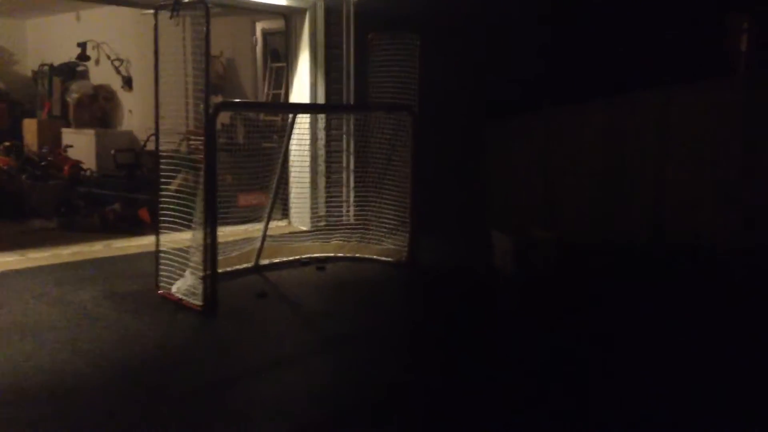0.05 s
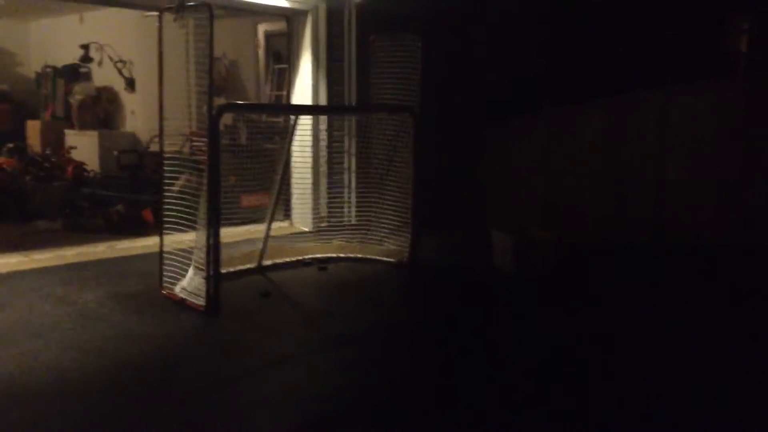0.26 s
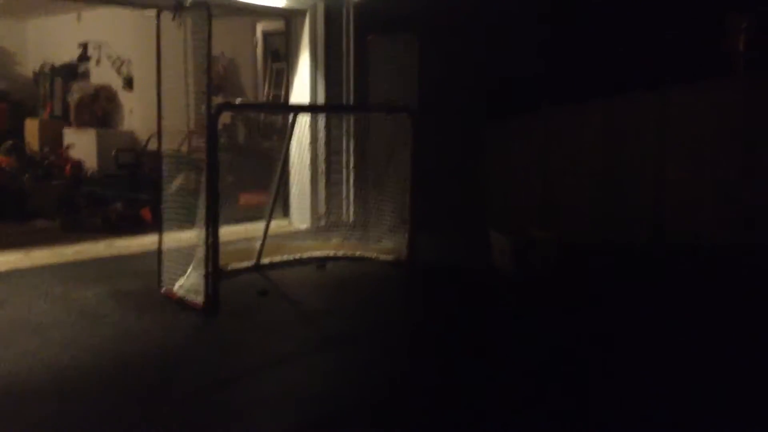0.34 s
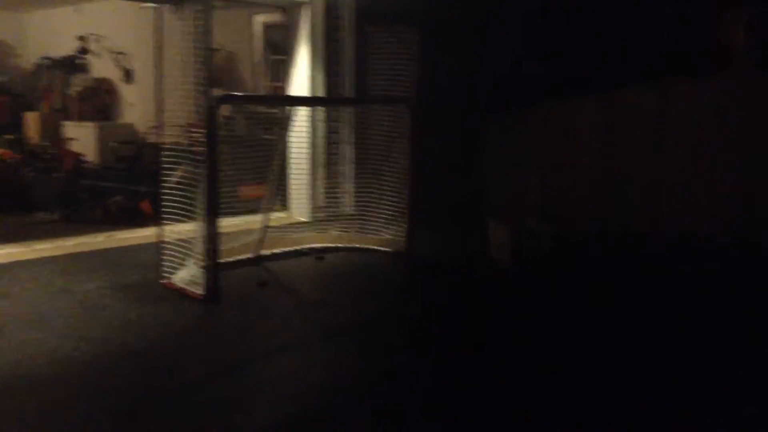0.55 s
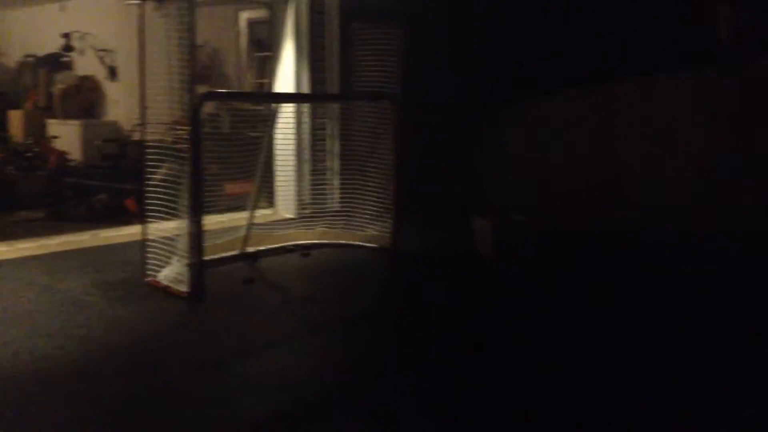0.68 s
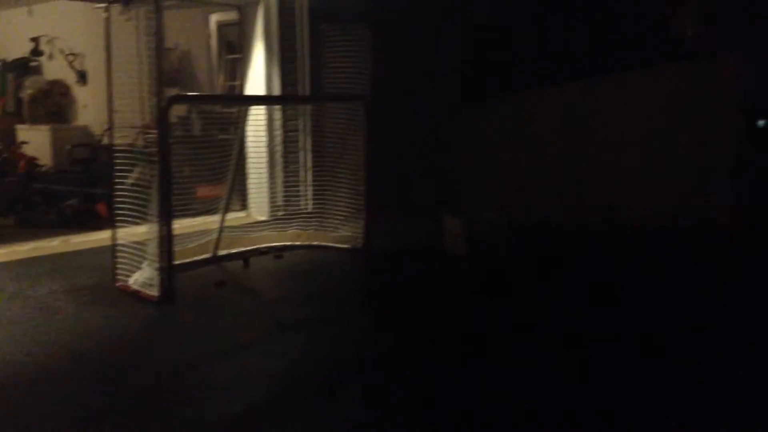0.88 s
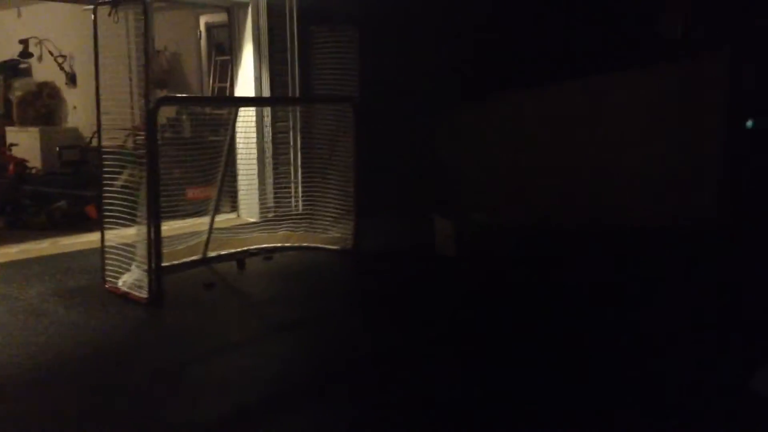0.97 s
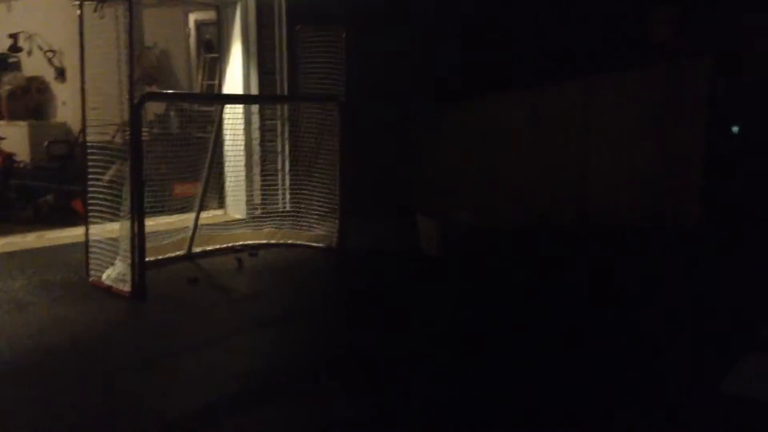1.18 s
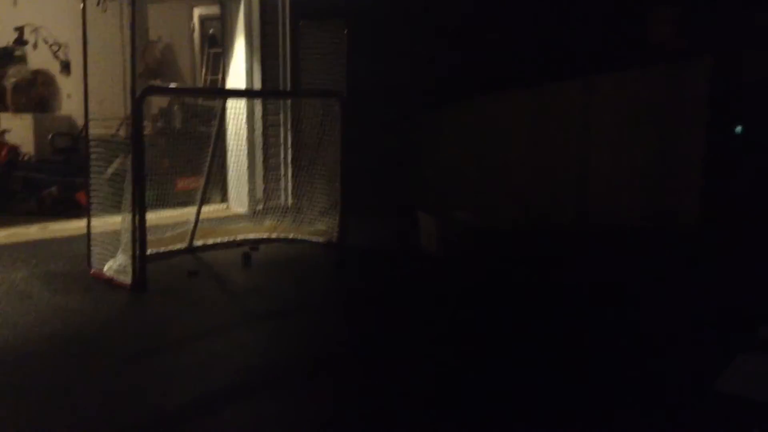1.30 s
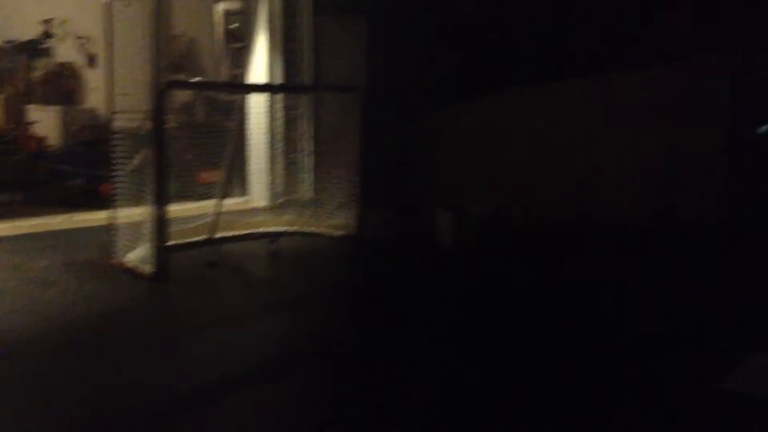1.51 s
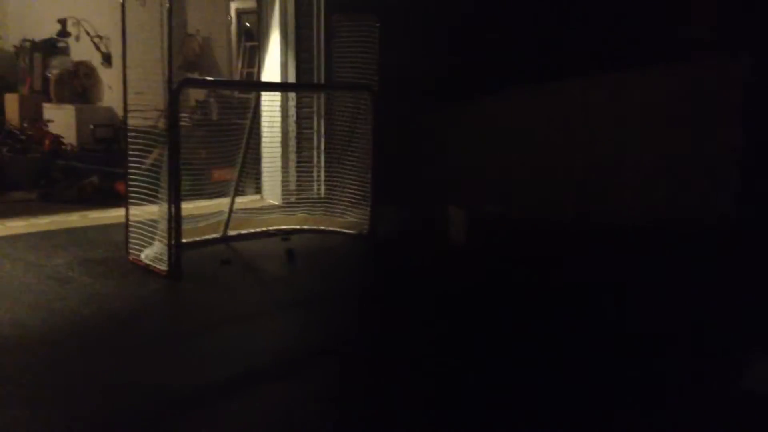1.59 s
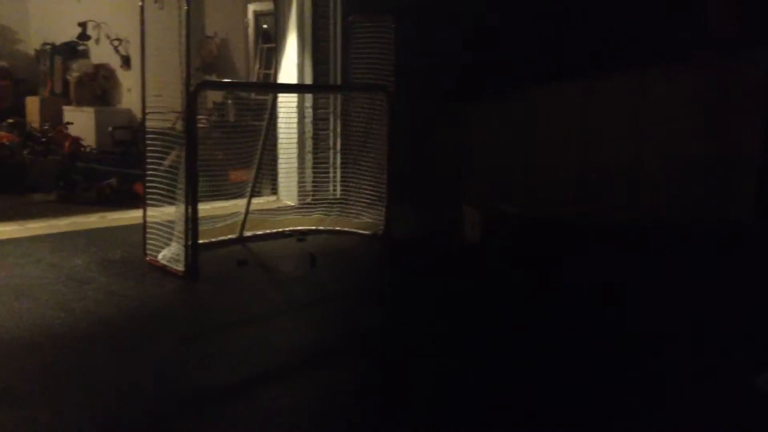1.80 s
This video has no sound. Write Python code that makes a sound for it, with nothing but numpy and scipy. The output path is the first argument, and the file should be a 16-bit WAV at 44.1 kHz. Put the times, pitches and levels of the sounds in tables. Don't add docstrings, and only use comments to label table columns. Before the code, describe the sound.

One sharp hockey stick crack outdoors, quick wall echoes, then wind rumble, knocks and a shoe squeak

```python
import sys
import numpy as np
from scipy import signal
from scipy.fft import rfft, irfft
from scipy.io import wavfile
from scipy.ndimage import uniform_filter1d

SR = 44100
rng = np.random.default_rng(int(sys.argv[2]) if len(sys.argv) > 2 else 0)


def generate_wav(signal):
    frames = np.transpose(np.atleast_2d(signal))
    scaled = np.clip(frames, -1, 1) * 32767
    pcm = np.round(scaled).astype(np.int16)
    wavfile.write(sys.argv[1], SR, pcm)


def invert_db(level):
    return 10 ** (np.asarray(level, dtype=float) / 20)


N = 81585

# start_s, force_db, hardness (0-1)
CONTACTS = [
    (.2440, -4.5, 0.9),
    (.2455, -0.5, 1),
    (.2483, 3, 0.82),
    (.2522, -9, 0.5),
    (.2548, -36, 0),
    (.2594, -5, 1),
    (.2618, -13, 1),
    (.2631, -13, 0.9),
]
# pitch_hz, level_db, t60_s
BLADE_MODES = [(406, -9, 0.067), (957.4, -7.5, 0.099), (1190, -16, 0.038), (1568, -2, 0.09),
               (1680, -12, 0.12), (2090, 3.5, 0.039), (2173, -8, 0.082), (2500, -10, 0.067),
               (2750, -27, 0.035), (3360, -5.5, .03), (3570, -11, 0.032), (4260, -3.5, 0.036),
               (6600, -14, 0.06), (9430, -8.5, 0.06)]
# freq_hz, level_db (per Hz)
SCRAPE_SPECTRUM = [(300, -41), (600, -30), (1000, -12), (2200, -3.5), (4800, -18), (8300, -18), (9400, -15),
                   (15500, -36)]
# delay_s, peak_db, centre_hz, width_hz
ECHOES = [(.026, -10, 1790, 1510), (.032, -9, 870, 396), (.042, -19, 860, 510), (.050, -14, 1700, 1200),
          (.057, -18, 900, 300), (.073, -21, 2130, 400), (.074, -29, 950, 300), (.056, -24, 2130, 300),
          (.059, -19, 3660, 500), (.100, -37, 850, 300), (.122, -23.5, 715, 136), (.132, -28, 715, 136),
          (.140, -31, 715, 136), (.148, -30, 740, 200), (0.116, -25, 862, 201), (.122, -29, 2000, 500),
          (.158, -35, 2150, 400), (.186, -32, 2150, 400), (.194, -28.5, 2180, 200), (.186, -28, 1300, 1000),
          (.242, -36, 950, 250), (.246, -37, 2300, 600), (.262, -36, 950, 300), (.187, -37, 6500, 1500),
          (.195, -35, 6550, 400), (0.230, -31.5, 1560, 250), (.232, -32.5, 6400, 4000),
          (.270, -38, 2300, 500), (.303, -33, 4630, 3900)]
# freq_hz, t60_s
YARD_DECAY = [(300, 0.22), (800, 0.42), (1500, 0.35), (3000, .26), (6000, .24), (10000, 0.2), (15000, 0.17)]
# freq_hz, level_db (per Hz)
YARD_SPECTRUM = [(350, -19), (600, -17), (880, -4), (1200, -11.5), (2100, -7.5), (4000, -12), (11500, -21),
                 (15000, -36)]
# pitch_hz, width_hz, boost_db
STICK_IN_YARD = [(1560, 160, 5.5), (2140, 150, 7.5), (2590, 92, 5), (6550, 250, 2.5), (9400, 600, 4)]
# start_s, peak_db, pitch_hz, cycles, snap_db
TICKS = [(.052, -42.5, 9300, 9.5, -8), (.211, -43, 5570, 4.2, -3), (.526, -38, 10500, 8, -20),
         (0.532, -36, 11400, 4, -20), (.537, -32, 10500, 4.5, -20), (0.6388, -22, 1380, 0.55, -30),
         (1.1703, -22, 2100, 2, -16), (1.1705, -22, 750, 1.2, -30), (1.1724, -21, 1000, 1.5, -20),
         (1.2553, -16, 1020, 2.7, -24), (1.2559, -11, 2100, 2.9, -26), (1.223, -49, 6040, 3.5, 0),
         (1.556, -46, 4000, 1.6, 12), (1.571, -29.5, 1035, 3.4, -12), (1.6030, -14.5, 278, 1.06, -44),
         (1.662, -33, 2180, 9, -15), (1.668, -36, 2180, 8, -20), (1.662, -36, 1080, 4, -30),
         (1.685, -35, 3150, 6, 0), (1.697, -33, 1150, 2.5, -15), (1.7748, -19.5, 2150, 2.9, -7),
         (1.7755, -29, 1200, 2.5, -10), (1.7748, -34, 3890, 7, -20), (1.7868, -28, 2100, 5, -10),
         (1.7865, -35, 1150, 3, -25), (1.7445, -36, 2100, 9, -20), (1.717, -46, 9000, 18, -20),
         (.0865, -30, 510, 2.5, -30), (1.2557, -44, 8600, 13, -30), (1.2557, -47, 6830, 12, -30),
         (1.2558, -40, 4260, 8, -30), (1.2592, -29, 1600, 3, -7), (1.268, -39, 1800, 3, -14),
         (1.1715, -26, 2140, 3.2, -15), (1.6015, -28, 560, 1.6, -30), (1.628, -38, 2000, 5, -20),
         (.036, -36, 520, 2, -30)]
# start_s, length_s, rms_db, centre_hz, width_hz
RUSTLES = [(.02, 0.059, -61.5, 4000, 4000), (.172, .046, -65, 5700, 900), (0.162, 0.067, -63, 10000, 1500),
           (0.499, 0.069, -55, 10500, 3000), (.91, .07, -69, 10600, 2000), (0.946, 0.036, -63, 4500, 2000),
           (1.209, .15, -55.5, 2500, 1940), (1.515, 0.18, -50, 1800, 1500),
           (1.647, 0.22, -42.5, 2040, 1680), (1.675, 0.05, -55, 3200, 1200), (1.687, 0.051, -54, 9200, 900),
           (1.713, 0.031, -59, 6600, 500), (1.547, .3, -66, 9000, 1200), (1.69, 0.025, -48, 1640, 201),
           (1.69, 0.025, -49, 850, 200), (0.074, 0.022, -50.5, 490, 303), (.915, .045, -47, 603, 397),
           (1.692, .024, -52, 4250, 250), (1.70, .08, -49, 1700, 120), (1.70, .055, -52, 2350, 250),
           (1.75, .02, -57, 3900, 300), (1.79, .02, -54, 2900, 300)]
# partial_number, level_db
SQUEAK_PARTIALS = [(1, -41), (2, -34), (3, -54), (5, -62)]
# freq_hz, level_db (per Hz)
WIND_SPECTRUM = [(20, -49), (60, -25), (110, -7), (180, 1), (260, -4), (380, -9), (560, -26.5), (900, -35),
                 (1500, -61.5)]
# time_s, level_db
GUSTS = [(0, -39), (.05, -33), (.11, -40), (.15, -51.5), (.21, -43.5), (.3, -43.5), (.42, -46.5),
         (.54, -35), (.58, -37.5), (.70, -31), (.8, -34.5), (.93, -32.5), (1.05, -38), (1.22, -33),
         (1.36, -32), (1.55, -40.5), (1.72, -38.5), (1.85, -33.5)]
# freq_hz, level_db (per Hz)
AIR_SPECTRUM = [(18, -64), (30, -52), (106, 1), (226, -5), (566, -15), (2100, -25.5), (3280, -42),
                (11800, -50.5), (15800, -49)]

BLADE_DB, SOFT_HZ, HARD_HZ = -16, 1200, 9000
STICK_LOW_HZ, STICK_TOP_HZ = 330, 14000
SHAFT_S, SHAFT_HZ, SHAFT_DB, SHAFT_RISE_S, SHAFT_HOLD_S, SHAFT_T60_S = .24385, 850, -8.5, .00052, .012, .055
SCRAPE_S, SCRAPE_LEN_S, SCRAPE_DB, SCRAPE_RISE_S, SCRAPE_T60_S = .2445, .017, -13.5, .0018, .034
ECHO_T60_S = .028
YARD_S, YARD_DB, YARD_HOLD_S, YARD_RISE_S, YARD_PATCH_DB = .25, -23.5, .055, .014, 1.6
WALL_END_S, WALL_END_DB = .075, -5
FAR_DB, FAR_STRETCH = -12.5, 4.46
FENCE_S, FENCE_LEN_S, FENCE_DB = .225, .08, 3.5
SNAP_S, SNAP_TOP_HZ, PORT_HZ, PORT_DB = .0018, 3890, 9000, -12.5
GRAINS_PER_S, GRAIN_DB = 4900, 3
SQUEAK_S, SQUEAK_LEN_S, SQUEAK_HZ, SQUEAK_FLUTTER_DB = 1.664, .042, 848, 1.7
SQUEAK_SAG, SQUEAK_WOBBLE = .04, .014
SQUEAK_CATCH, SQUEAK_CATCH_S = .12, .009
LUMP_DB, LUMPS_PER_S, WIND_SPLIT_HZ = 2, 35, 133
AIR_DB, MIC_LOW_HZ = -45.5, 59


def evened(x):
    return x / np.sqrt(np.mean(x ** 2) + 1e-20)


def read(points, hz):
    f, value = np.transpose(points)
    return np.interp(np.log(hz + 1), np.log(f + 1), value)


def add(mix, start_s, sound):
    part = mix[max(round(start_s * SR), 0):][:len(sound)]
    part += sound[:len(part)]


def coloured(points, size):
    gain = invert_db(read(points, np.fft.rfftfreq(size, 1 / SR)))
    return evened(irfft(rfft(rng.standard_normal(size)) * gain, size))


def band(x, low_hz, top_hz):
    edges = np.clip([low_hz, top_hz], 20, 20000)
    return signal.lfilter(*signal.butter(2, edges, "band", fs=SR), x)


def blade():
    t, push = np.arange(4410) / SR, np.zeros(N)
    ring = sum(invert_db(db - 60 * t / t60) * np.sin(2 * np.pi * hz * t) for hz, db, t60 in BLADE_MODES)
    for k, (start_s, force_db, hardness) in enumerate(CONTACTS):
        corner_hz = SOFT_HZ * (HARD_HZ / SOFT_HZ) ** hardness
        pulse = np.exp(-2 * np.pi * corner_hz * t[:200])
        sign = (-1) ** (k + 1)
        add(push, start_s, sign * invert_db(force_db) * pulse / pulse.sum())
    return invert_db(BLADE_DB) * signal.oaconvolve(push, ring)[:N]


def shaft():
    t = np.arange(4410) / SR
    fall_db = 60 * np.maximum(t - SHAFT_HOLD_S, 0) / SHAFT_T60_S
    envelope = invert_db(SHAFT_DB - fall_db) * np.minimum(t / SHAFT_RISE_S, 1)
    return -envelope * np.sin(2 * np.pi * SHAFT_HZ * t)


def scrape():
    t = np.arange(4410) / SR
    fall_db = 60 * np.maximum(t - SCRAPE_LEN_S, 0) / SCRAPE_T60_S
    envelope = np.minimum(t / SCRAPE_RISE_S, 1) * invert_db(SCRAPE_DB - fall_db)
    return envelope * coloured(SCRAPE_SPECTRUM, 4410)


def slap():
    out = blade()
    add(out, SHAFT_S, shaft())
    add(out, SCRAPE_S, scrape())
    return band(out, STICK_LOW_HZ, STICK_TOP_HZ)


def echoes(shot):
    out = np.zeros(N)
    since_s = np.maximum(np.arange(N) / SR - SCRAPE_S, 0)
    crack = shot * invert_db(-60 * since_s / ECHO_T60_S)
    for delay_s, peak_db, hz, width_hz in ECHOES:
        edges = hz - width_hz / 2, hz + width_hz / 2
        echo = band(band(crack, *edges), *edges)
        add(out, delay_s, invert_db(peak_db) * echo / np.abs(echo).max())
    return out


def yard_tail():
    hz, t, z = signal.stft(coloured(YARD_SPECTRUM, SR), SR, nperseg=512)
    fall_db = -60 * np.maximum(t - YARD_HOLD_S, 0) / read(YARD_DECAY, hz)[:, None]
    near = invert_db(fall_db + WALL_END_DB * np.clip((t - WALL_END_S) / .01, 0, 1))
    inside_s = np.minimum(t - FENCE_S, FENCE_S + FENCE_LEN_S - t)
    fence = invert_db(FENCE_DB * np.clip(inside_s / .012, 0, 1))
    far = fence * invert_db(FAR_DB + fall_db / FAR_STRETCH)
    patches = uniform_filter1d(rng.standard_normal(z.T.shape), 5, 0)
    patches = evened(uniform_filter1d(patches, 5, 1)).T
    rings_db = sum(db * np.exp(-((hz - f) / width_hz) ** 2) for f, width_hz, db in STICK_IN_YARD)
    gain = invert_db(YARD_PATCH_DB * patches + rings_db[:, None]) * (near + far)
    tail = signal.istft(z * gain, SR, nperseg=512)[1]
    rise = np.minimum(np.arange(len(tail)) / SR / YARD_RISE_S, 1)
    return invert_db(YARD_DB) * tail * rise


def yard(shot):
    out = echoes(shot)
    add(out, YARD_S, yard_tail())
    return out


def ticks():
    out, t = np.zeros(N), np.arange(900) / SR
    noise = rng.standard_normal((len(TICKS), 900))
    noise = band(band(noise, 540, SNAP_TOP_HZ), 850, SNAP_TOP_HZ)
    port = 0
    raw = rng.standard_normal((len(TICKS), 900))
    port = band(raw, PORT_HZ - 1200, PORT_HZ + 1200) * np.exp(-t / SNAP_S)
    snaps = noise + invert_db(PORT_DB) * port
    snap_envelope = np.exp(-t / SNAP_S) * np.minimum(t / .00096, 1)
    for (start_s, peak_db, hz, cycles, snap_db), snap in zip(TICKS, snaps):
        u = 4 * t * hz / cycles
        ring = -(u / 2) ** 2 * np.exp(2 - u) * np.sin(2 * np.pi * hz * t)
        add(out, start_s, invert_db(peak_db) * (ring + 3 * invert_db(snap_db) * snap * snap_envelope))
    return out


def rustles():
    out = np.zeros(N)
    draws = rng.random((len(RUSTLES), 2, 12000))
    for (start_s, length_s, rms_db, hz, width_hz), (when, size) in zip(RUSTLES, draws):
        sizes = invert_db(-GRAIN_DB * np.log(size + .003)) * np.sign(np.cos(999 * size))
        grains = (when < GRAINS_PER_S / SR) * sizes
        n = min(round(length_s * SR), 12000)
        rustle = evened(band(grains, hz - width_hz / 2, hz + width_hz / 2))[:n]
        add(out, start_s, invert_db(rms_db) * rustle * np.sqrt(np.hanning(n)))
    return out


def squeak():
    out, u = np.zeros(N), np.arange(0, 1, 1 / (SR * SQUEAK_LEN_S))
    wobble = evened(uniform_filter1d(rng.standard_normal(4000), 150))[:len(u)]
    catch = SQUEAK_CATCH * np.exp(-u * SQUEAK_LEN_S / SQUEAK_CATCH_S)
    pitch_hz = SQUEAK_HZ * (1 - SQUEAK_SAG * (u - .4) + SQUEAK_WOBBLE * wobble - catch)
    turns = np.cumsum(pitch_hz) / SR
    tone = sum(invert_db(db) * np.sin(2 * np.pi * k * turns) for k, db in SQUEAK_PARTIALS)
    flutter = evened(uniform_filter1d(rng.standard_normal(4000), 90))[:len(u)]
    swell = np.sin(np.pi * u ** .65) * np.sqrt(2)
    add(out, SQUEAK_S, invert_db(SQUEAK_FLUTTER_DB * flutter) * tone * swell)
    return out


def wind():
    t, noise = np.arange(N) / SR, coloured(WIND_SPECTRUM, N)
    low = signal.filtfilt(*signal.butter(2, WIND_SPLIT_HZ, fs=SR), noise)
    knots = rng.standard_normal((2, 400))
    low_lumps, high_lumps = [invert_db(LUMP_DB * np.interp(t * LUMPS_PER_S, np.arange(400), k)) for k in knots]
    time_s, level_db = np.transpose(GUSTS)
    return invert_db(np.interp(t, time_s, level_db)) * evened(low * low_lumps + (noise - low) * high_lumps)


def night_air():
    return invert_db(AIR_DB) * evened(band(coloured(AIR_SPECTRUM, N), 480, 15000))


def scene():
    shot = slap()
    return (shot + yard(shot) + ticks() + rustles() + squeak() + wind() + night_air())[None]


def roll_off(x):
    return signal.sosfilt(signal.butter(12, 15320, fs=SR, output="sos"), x)


def record(dry):
    x = signal.lfilter(*signal.butter(2, MIC_LOW_HZ, "high", fs=SR), dry)
    limited = x / (1 + np.abs(x) ** 8) ** (1 / 8)
    return roll_off(limited)


dry = scene()
out = record(dry)
generate_wav(out)
```